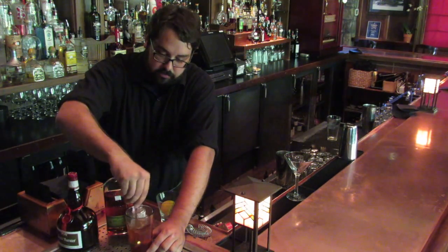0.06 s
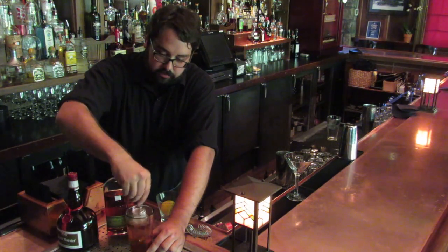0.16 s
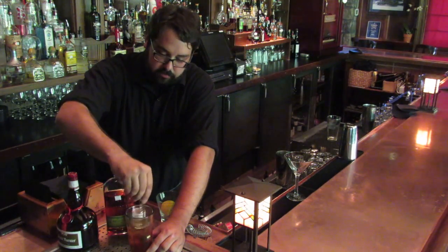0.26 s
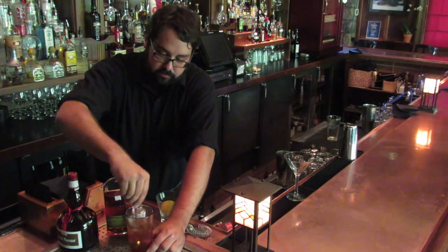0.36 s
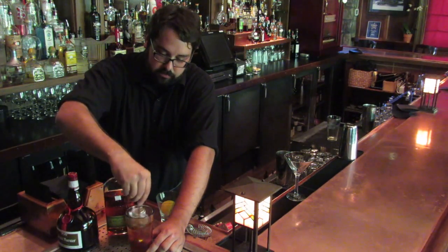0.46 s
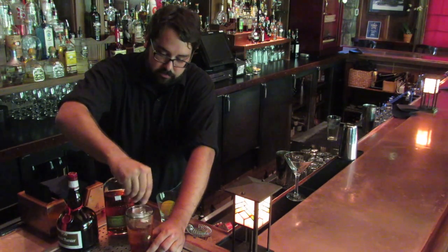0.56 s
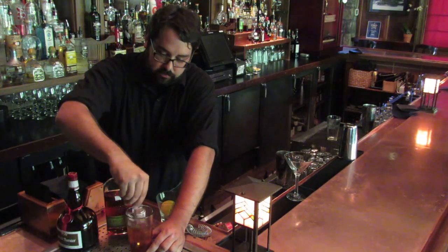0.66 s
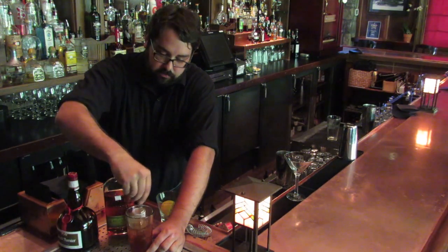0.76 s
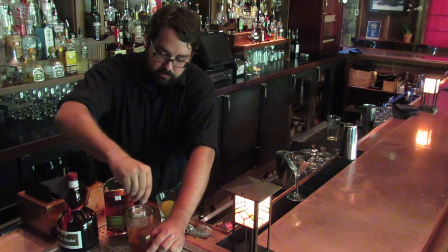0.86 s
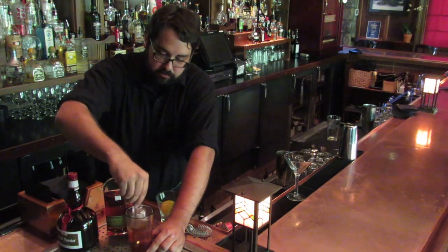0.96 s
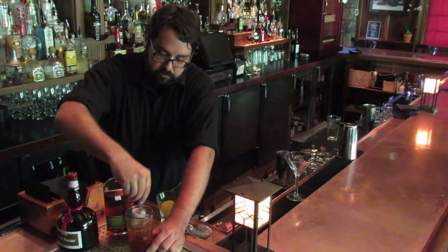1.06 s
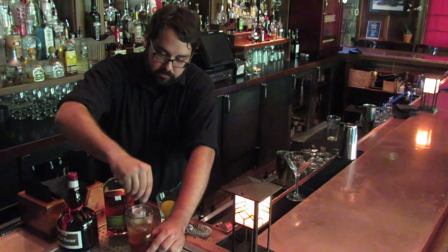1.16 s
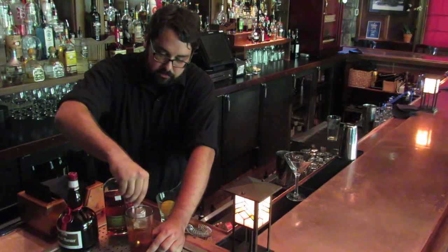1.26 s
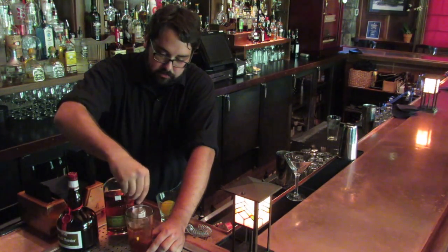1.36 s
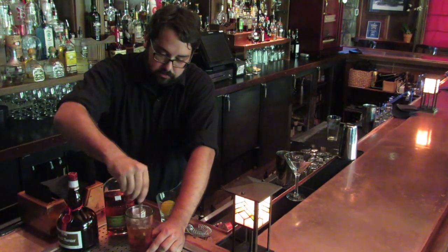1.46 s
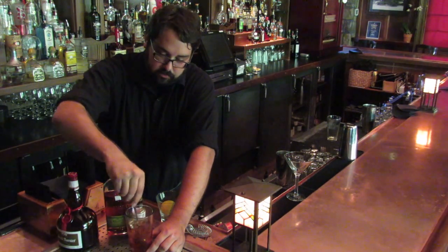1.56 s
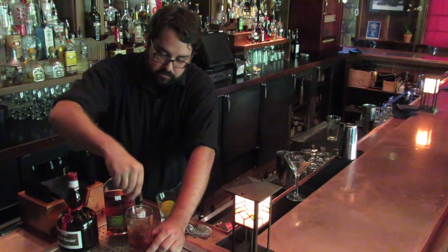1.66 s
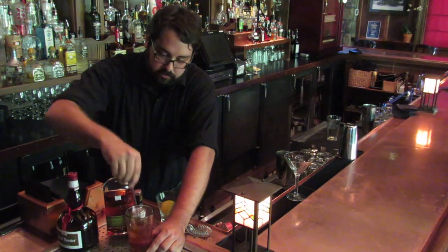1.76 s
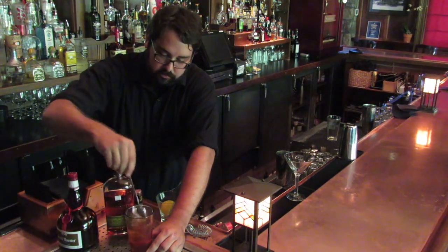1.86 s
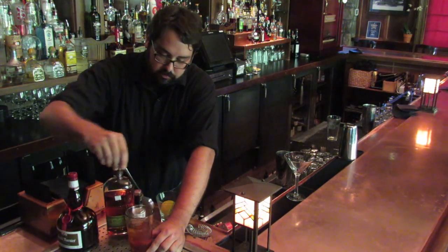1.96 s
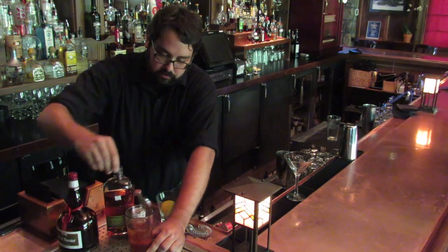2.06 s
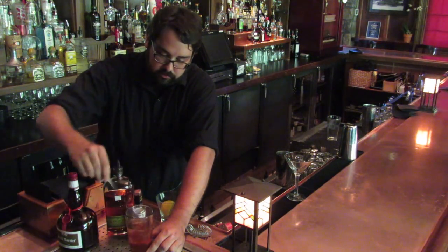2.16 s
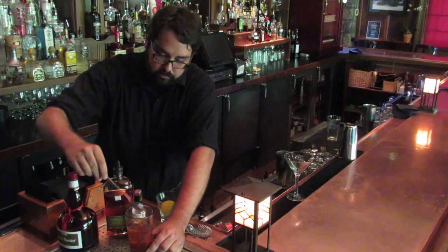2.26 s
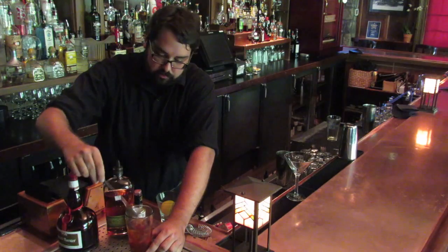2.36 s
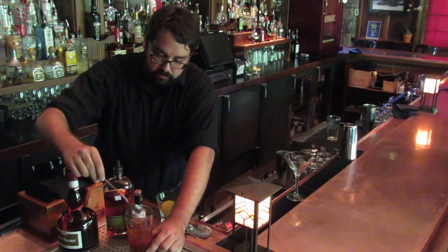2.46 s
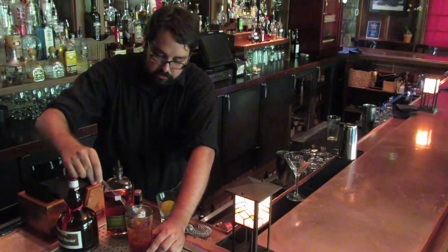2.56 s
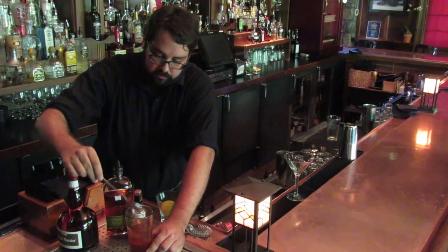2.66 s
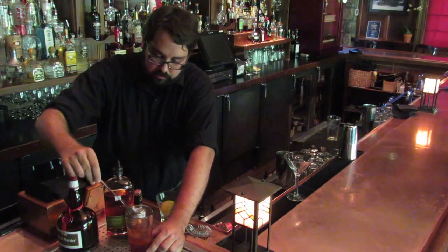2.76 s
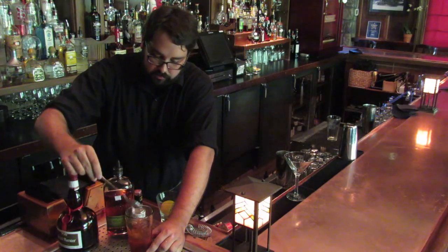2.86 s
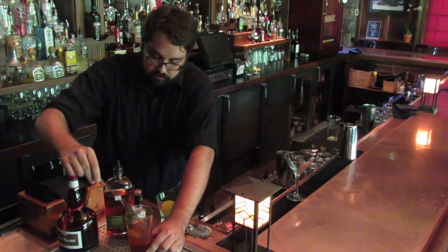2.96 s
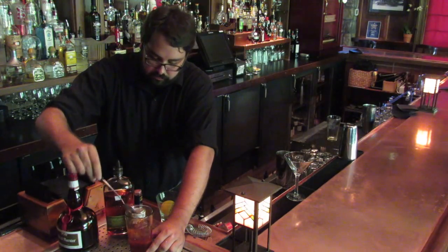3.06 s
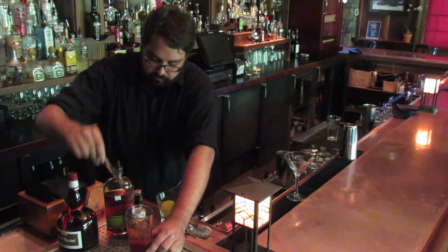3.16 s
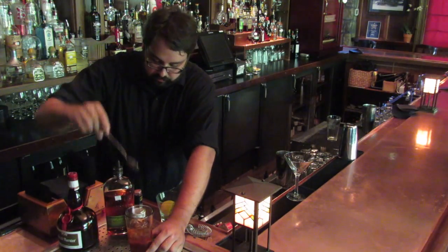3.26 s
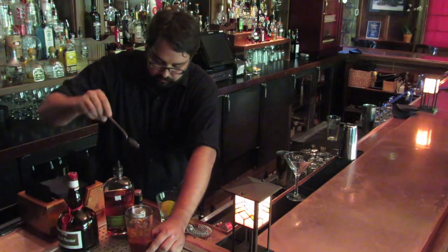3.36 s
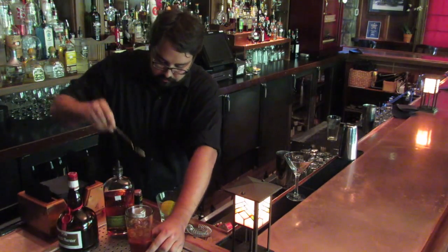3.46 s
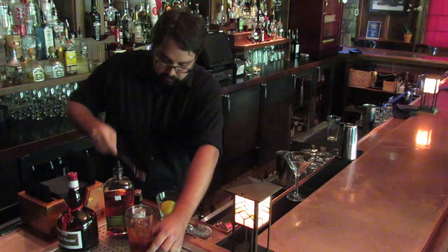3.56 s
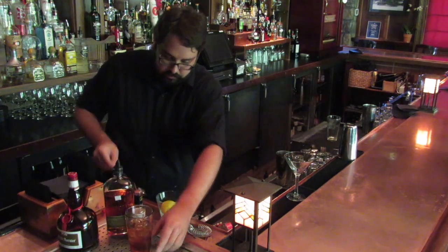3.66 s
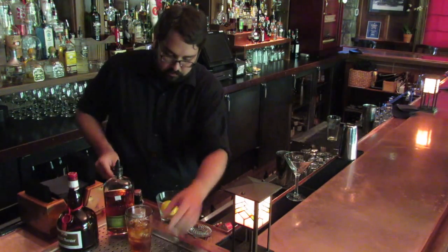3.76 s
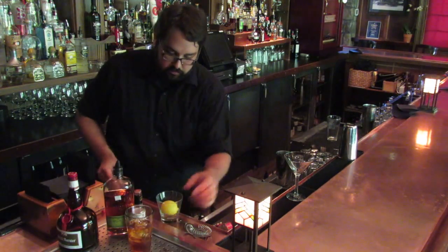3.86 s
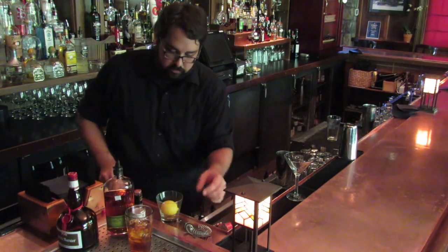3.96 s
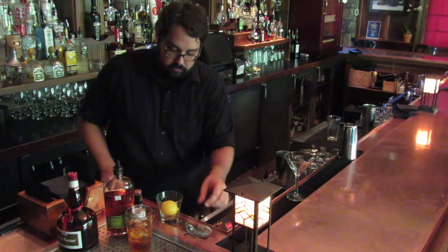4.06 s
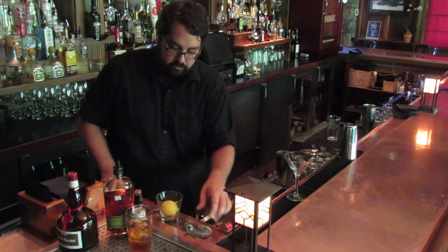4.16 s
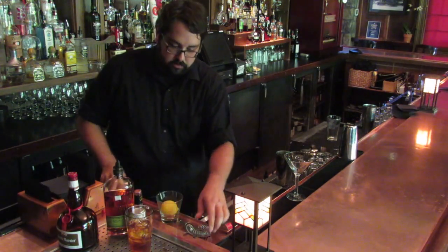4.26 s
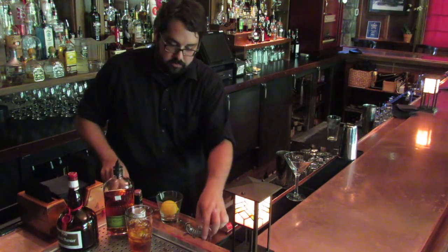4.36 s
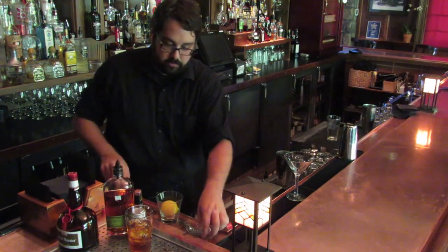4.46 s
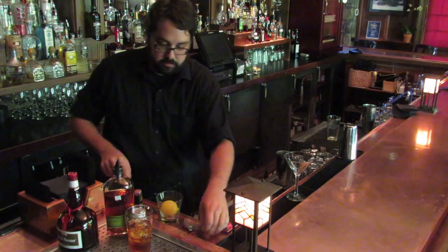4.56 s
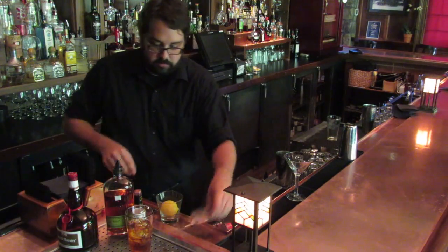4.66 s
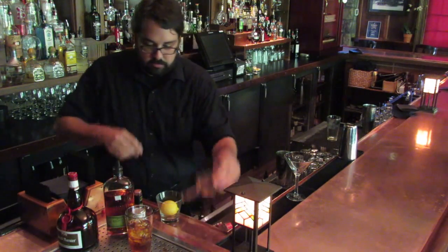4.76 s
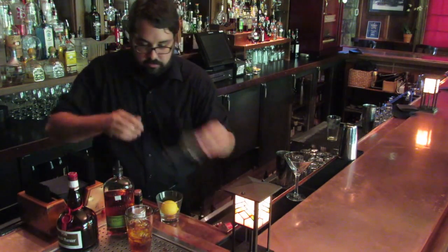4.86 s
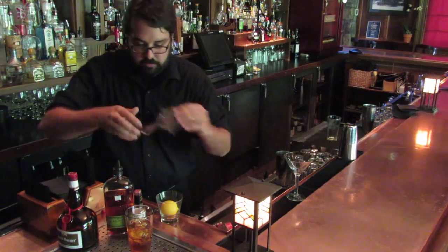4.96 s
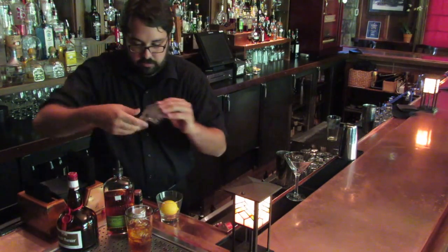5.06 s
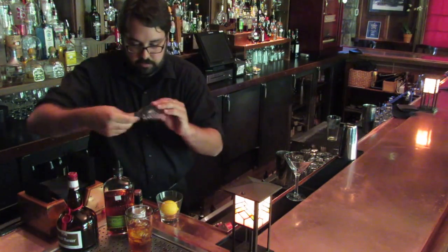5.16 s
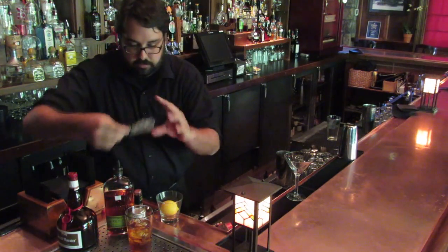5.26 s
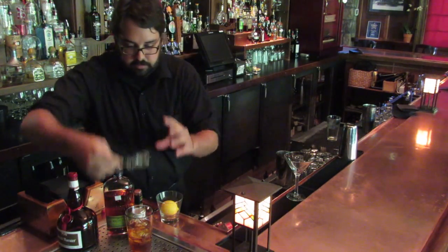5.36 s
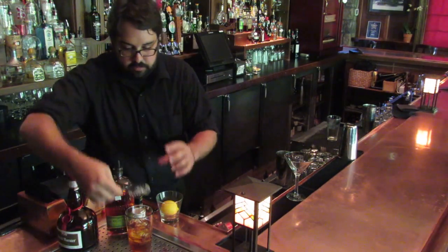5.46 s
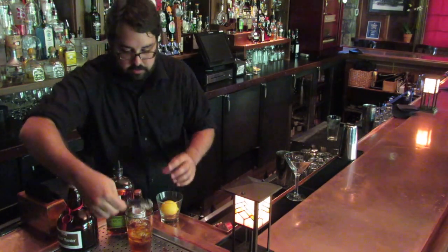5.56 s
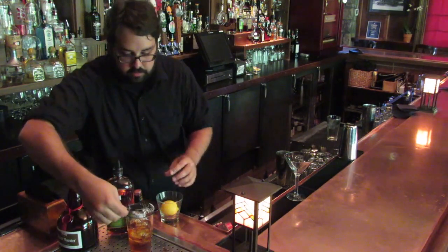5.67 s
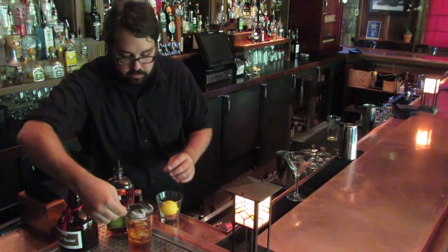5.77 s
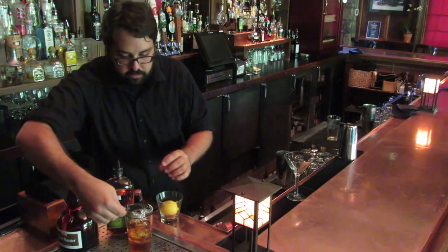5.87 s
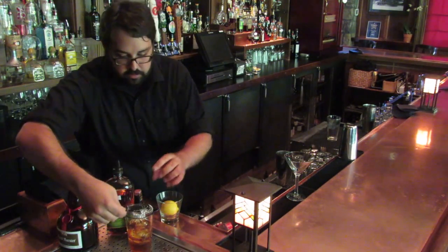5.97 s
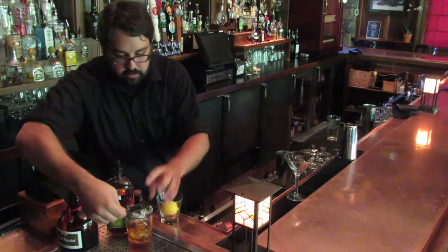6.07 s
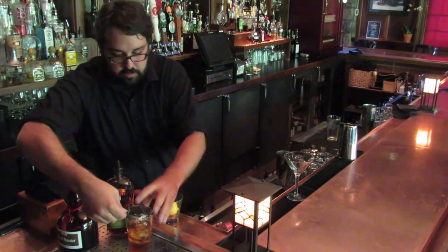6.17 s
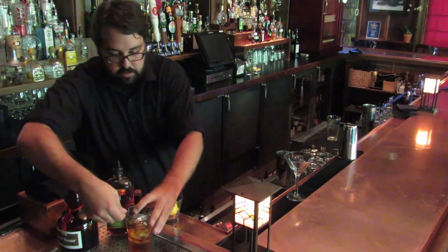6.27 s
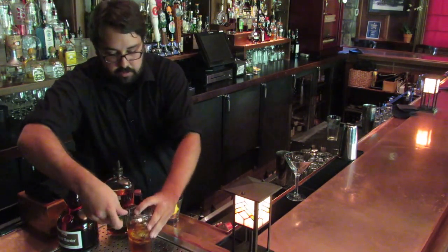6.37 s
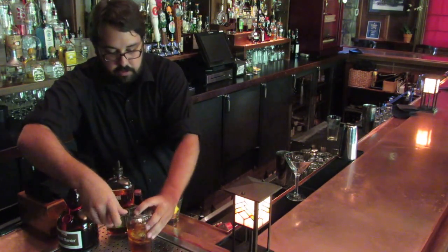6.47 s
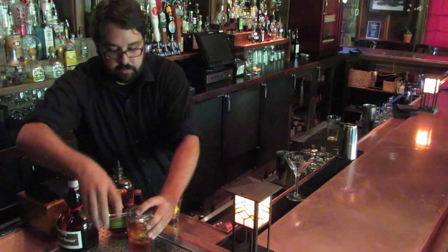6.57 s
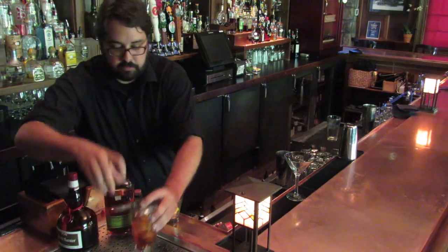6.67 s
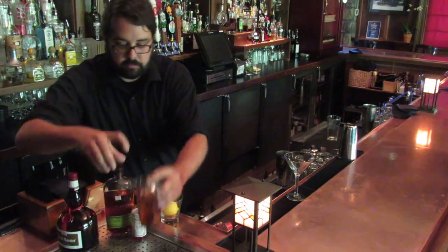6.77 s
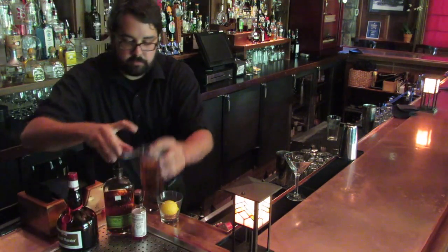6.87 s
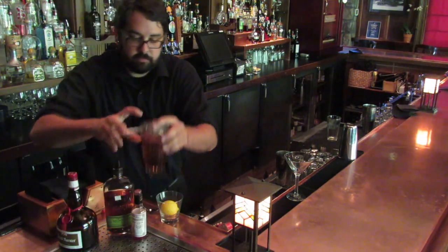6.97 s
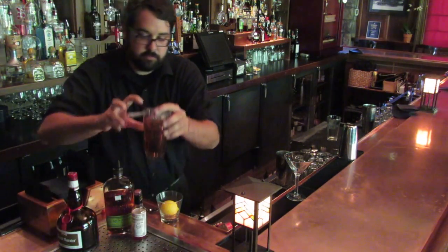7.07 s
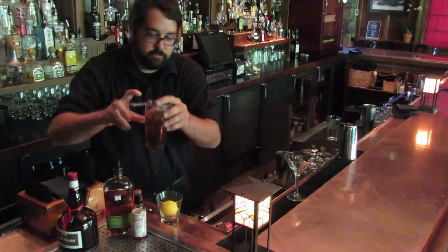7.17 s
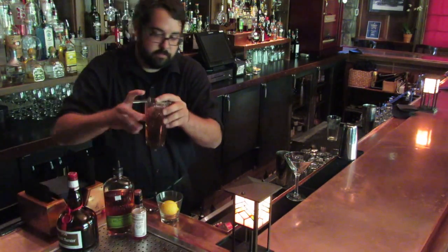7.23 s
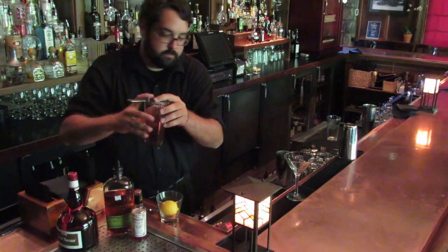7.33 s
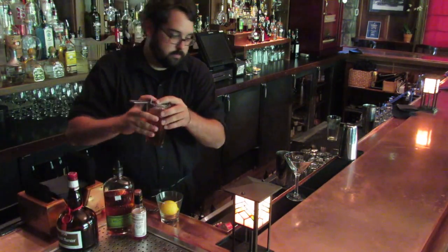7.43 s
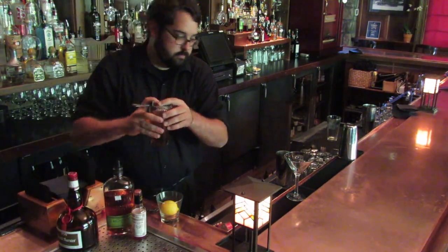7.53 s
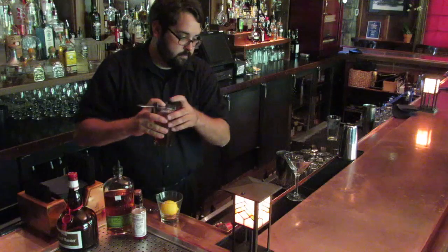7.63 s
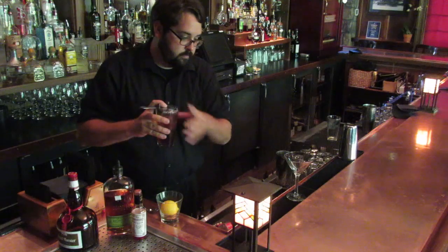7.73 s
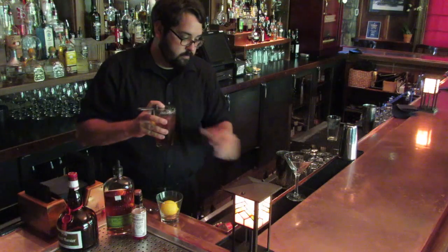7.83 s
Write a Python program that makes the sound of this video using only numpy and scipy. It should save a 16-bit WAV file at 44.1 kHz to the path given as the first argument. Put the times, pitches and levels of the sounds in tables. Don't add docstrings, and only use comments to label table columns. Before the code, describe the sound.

Ice clinks and sloshes under a stirring spoon, five ringing rim taps follow, then counter knocks, springy metal rattle and small glass clinks in a humming bar.

```python
import sys
import numpy as np
from scipy import signal
from scipy.fft import rfft, irfft
from scipy.io import wavfile

SR = 44100
rng = np.random.default_rng(int(sys.argv[2]) if len(sys.argv) > 2 else 0)


def elevation(decibels):
    levels = np.asarray(decibels, float)
    return 10 ** (levels / 20)


def wrap_up_sound(samples):
    columns = np.atleast_2d(samples).T
    tamed = np.clip(columns, -1, 1)
    steps = np.round(tamed * 32767).astype(np.int16)
    wavfile.write(sys.argv[1], SR, steps)


N = 348390


def rms_one(x):
    return x / np.sqrt(np.mean(x ** 2) + 1e-20)


def at_hz(points, hz):
    points = np.array(points)
    return np.interp(np.log(hz + 1), np.log(points[:, 0]), points[:, 1])


def colour(x, spectrum):
    gain = elevation(at_hz(spectrum, np.fft.rfftfreq(N, 1 / SR)))
    return rms_one(irfft(rfft(x) * gain, N))


def bandpass(x, low_hz, high_hz):
    return signal.sosfilt(signal.butter(2, [low_hz, high_hz], "band", fs=SR, output="sos"), x)


def ring(clicks, hz, t60):
    radius = elevation(-60 / (t60 * SR))
    angle = 2 * np.pi * hz / SR
    return signal.lfilter([0, np.sin(angle)], [1, -2 * radius * np.cos(angle), radius ** 2], clicks + 1e-18)


def clicks_at(seconds, sizes):
    out = np.zeros(N)
    np.add.at(out, np.round(np.asarray(seconds) * SR).astype(int), sizes)
    return out


def grains(per_s, spread_db):
    sizes = elevation(spread_db * np.minimum(rng.exponential(1, N), 4)) * rng.choice([-1, 1], N)
    return sizes * (rng.random(N) < per_s / SR)


# t/s, level/dB
GAIN_DUCKS = [
    (2.26, 5),
    (2.45, 2.5),
    (2.66, 4),
    (2.85, 2),
    (3.061, 3),
    (6.56, 3.0),
]


def gain_control_db():
    duck_s, recover_db_per_s = 0.16, 5
    t = np.arange(N) / SR
    climb = recover_db_per_s * t
    for s, db in GAIN_DUCKS:
        climb -= db * (1 - np.exp(-np.maximum(t - s, 0) / duck_s))
    return climb - np.maximum.accumulate(climb)


# f/Hz, level/dB (per Hz)
RUMBLE = [(15, -41), (30, -27), (64, -21), (140, -12), (170, -6.5), (285, -10), (326, -14), (420, -15.5),
          (650, -27.5), (1040, -27), (2280, -39), (3200, -46.5), (8000, -52.5), (16000, -61)]
# f/Hz, width/Hz, level/dB (re rumble)
DRONES = [(63.5, 1.8, -20.5), (80.1, 1.6, -16.5), (164.5, 5.1, -11.5), (214, 3.7, -16), (240.2, 3.2, -15),
          (292.3, 3.4, -11), (362.9, 7.7, -17), (407.5, 3.9, -15), (454.4, 8.1, -22.5), (518.8, 13, -27.5)]
IN_STEP_S = [.15, 1.0, 1.8, 3.25, 4.3, 5.5, 6.65, 7.95]
# f/Hz, unshared share/1
APART = [(60, 0.13), (300, 0.42), (700, 0.57), (1500, 0.31), (4000, 0.15), (8000, 0.33), (15000, 0.95)]


def coolers():
    gain_db = gain_control_db()
    t = np.arange(N) / SR
    shared, left, right = rfft(rng.standard_normal((3, N)))
    hz = np.fft.rfftfreq(N, 1 / SR)
    apart = np.clip(at_hz(APART, hz), 0, 1)
    both = np.sqrt(1 - apart ** 2) * shared + apart * np.array([left, right])
    rumble = rms_one(irfft(both * elevation(at_hz(RUMBLE, hz)), N))
    for centre_hz, width_hz, level_db in DRONES:
        resonance = 1 / (1 + (2 * (hz - centre_hz) / width_hz) ** 2)
        rumble += elevation(level_db) * rms_one(irfft(shared * resonance, N))
    beats = np.interp(t, IN_STEP_S, np.arange(len(IN_STEP_S)))
    beat_db = 2 * np.cos(2 * np.pi * beats)
    hum = np.sqrt(2) * np.sin(2 * np.pi * 120 * t)
    return elevation(gain_db - 29) * rumble + elevation(gain_db + beat_db - 27) * hum


# f/Hz, t60/s
ROOM = [(700, 1), (2000, 0.62), (4500, 0.53), (8000, 0.44), (13000, 0.35)]


def room(x):
    early_t60_s, early_db = 0.13, -3.5
    sway_per_s = 2.3
    t = np.arange(SR) / SR
    tail = 0
    for low in 350 * 2 ** np.arange(0, 6.):
        high = min(2 * low, .45 * SR)
        hz = np.sqrt(low * high)
        shared, left, right = rng.standard_normal((3, 2, SR))
        apart = np.clip(0.25 * at_hz(APART, hz), 0, 1)
        noise = np.sqrt(1 - apart ** 2) * shared + apart * np.array([left, right])
        decay = elevation(-60 * t / at_hz(ROOM, hz)) + elevation(early_db - 60 * t / early_t60_s)
        tail = tail + bandpass(noise, low, high) * decay
    tail *= np.clip((t - .0015) / 0.0033, 0, 1)
    tail /= np.sqrt(np.mean(np.sum(tail ** 2, axis=2)))
    sway = np.pi * sway_per_s * np.arange(N) / SR
    shares = x * np.array([np.cos(sway), np.sin(sway)])
    return signal.fftconvolve(shares[None], tail, axes=2).sum(axis=1)[:, :N]


SHAKES_S = [3.919, 4.323, 4.618, 5.692, 5.722, 6.146, 6.409]
# hold/s, level/dB, jolt/dB
RATTLE = [
    (.005, -46.5, 13.5),
    (0.22, -45.5, 14),
    (0.0045, -43, 8),
    (.025, -55, 1.5),
    (0.0043, -51, 0),
    (0.039, -41, 1),
    (.005, -41, 9),
]


def rattle_level():
    jolt_s, fall_db_per_s = 0.014, 177
    t, level = np.arange(N) / SR, 0
    for s, (hold, db, jolt_db) in zip(SHAKES_S, RATTLE):
        since = np.maximum(t - s, 0)
        fall_db = fall_db_per_s * np.maximum(since - hold, 0)
        level = level + (t >= s) * elevation(db + jolt_db * np.exp(-since / jolt_s) - fall_db)
    return level


# f/Hz, level/dB (per Hz)
SPRING = [(710, -27), (1200, -10.5), (2320, 0.5), (3870, -16.5), (6650, -4.5), (11700, -8), (16000, -21)]
# f/Hz, level/dB, t60/s
PLATE = [(6600, -5.5, 0.14), (7300, -2.5, 0.13), (10000, -14, .1), (11100, -7, 0.072), (13450, -14, .08)]
# t/s, level/dB, low mode/dB, middle mode/dB, high modes/dB
PLATE_HITS = [(3.929, -48, -15, 5, -11), (4.324, -34, 6, -8, -11), (4.40, -54, -5, -6, -10),
              (4.462, -42.5, 9, 1, -10), (4.586, -34, -18, -20, 0), (4.69, -44, -18, -20, 0)]
# f/Hz, level/dB, t60/s
LIFT = [(4400, 3.5, 0.0069), (7080, 1, 0.01), (10900, -2, 0.0065)]
# t/s, level/dB
LIFT_HIT = (6.9435, -29.5)


def strainer():
    out = elevation(-2.5) * rattle_level() * colour(grains(2500, spread_db=2.5), SPRING)
    hits = np.array(PLATE_HITS)
    for k, (hz, level_db, t60) in enumerate(PLATE):
        mode_db = hits[:, 2 + min(k, 2)]
        out += ring(clicks_at(hits[:, 0], elevation(hits[:, 1] + level_db + mode_db)), hz, t60)
    lift_s, lift_db = LIFT_HIT
    for hz, level_db, t60 in LIFT:
        out += ring(clicks_at([lift_s], elevation(lift_db + level_db)), hz, t60)
    return out


# t/s, level/dB (peak), brightest/octaves above 1 kHz, fall-off/dB per octave
KNOCKS = [(3.919, -19.5, 1.9, 5.5), (3.954, -43, 0.64, 6), (3.999, -33.5, .4, 14), (4.3242, -16, 2.23, 17),
          (4.3295, -25.5, .6, 0.5), (4.3971, -20, 0.32, 14), (4.436, -26, .6, 5), (4.456, -18.5, 1.65, 9),
          (4.567, -16.5, 1.67, 7), (4.619, -27, 1.67, 0.5), (5.6914, -25, 3.1, 2.5), (5.721, -34, 2.8, 16),
          (6.0474, -34, 2.6, 3.0), (6.1472, -32, 3.2, 20), (6.2022, -17, 0.72, 1.5),
          (6.2134, -26, 0.36, -0.5), (6.3837, -32, 2.8, 7), (6.4073, -17.5, 2.5, 3.0),
          (6.5596, -33, 2.6, 2.5), (6.9416, -17.5, 1.52, 8), (7.5654, -44, .4, 9), (7.586, -34, 1.4, 7)]
# low f/Hz, high f/Hz
KNOCK_BANDS_HZ = [(800, 2500), (2500, 6000), (6000, 10000), (10000, 16000)]


def knocks():
    s, peak_db, brightest, falloff = np.array(KNOCKS).T
    out = np.zeros(N)
    noise = rng.standard_normal(N)
    decays_s, trims_db = (0.0054, 0.0011, 0.0018, 0.0013), (-6, -6, -6, -4.5)
    for (low, high), decay_s, trim_db in zip(KNOCK_BANDS_HZ, decays_s, trims_db):
        band = rms_one(bandpass(noise, low, high))
        octave = np.log2(low * high / 1e6) / 2
        away = np.abs(octave - brightest)
        starts = clicks_at(s, elevation(peak_db - falloff * away + trim_db))
        out += band * signal.lfilter([1], [1, -np.exp(-1 / (decay_s * SR))], starts + 1e-18)
    return out


# t/s, level/dB (peak), f/Hz
CUBES = [(0.019, -27, 2880), (.0767, -24, 3690), (0.2796, -23, 3250), (0.297, -19, 2920),
         (.3596, -27, 2800), (0.4493, -24, 2930), (0.555, -22, 3100), (.5761, -35, 2900),
         (0.61, -18.5, 3050), (0.747, -27, 3020), (.7696, -16.5, 3710), (.8225, -24, 3730),
         (0.849, -16, 3280), (0.8714, -16.5, 2740), (0.9001, -15, 3070), (1.4082, -19, 3400),
         (1.5278, -19.5, 3030), (1.7442, -16.5, 2970), (1.7699, -36, 2840), (0.0215, -21, 1395),
         (1.059, -22, 1427), (1.11, -22.5, 1390), (1.1474, -19.5, 1350), (1.1889, -20.5, 1660),
         (1.649, -39, 1140)]
# t/s, level/dB (peak), f/Hz
SPOON = [(0.0782, -26, 9700), (.2249, -28, 9600), (.2922, -26, 9750), (.9068, -33, 9600),
         (1.1418, -20, 9620), (1.1877, -20, 9500), (1.4685, -25, 8860), (1.5953, -27, 10000),
         (1.7789, -28, 10100), (0.509, -16, 5100), (1.1283, -30, 5150), (1.711, -15, 5570)]
# t/s, level/dB (peak), f/Hz
TICKS = [(3.918, -24.5, 1620), (3.9603, -32, 1610), (4.3289, -19, 2450), (4.3989, -24, 2440),
         (4.4588, -20.5, 2970), (4.618, -39, 2360), (6.1998, -21, 1580), (6.219, -27, 1620),
         (6.4096, -40, 1840), (3.917, -26, 4320), (4.566, -29, 4660), (4.6184, -25.5, 5170),
         (4.6194, -23.5, 4520), (4.6738, -32, 4280), (5.692, -27, 10200), (5.7224, -28, 11000),
         (6.1494, -26, 9500)]
# t/s, level/dB, f/Hz, t60/s
BAR_TOP = (3.917, -33, 546, .1)


def pings():
    out, t = np.zeros(N), np.arange(SR // 8) / SR
    strikes = [(*row, 0.027 * (3000 / row[2]) ** 0.3) for row in CUBES]
    strikes += [(*row, 0.021) for row in SPOON]
    strikes += [(*row, 0.018) for row in TICKS]
    strikes += [BAR_TOP]
    for s, peak_db, hz, t60 in strikes:
        part = out[round(s * SR):][:len(t)]
        part += elevation(peak_db - 4.0 - 60 * t / t60) * np.sin(2 * np.pi * hz * t)
    chatter = rms_one(signal.lfilter([1], [1, -.93], rng.standard_normal(N)))
    return out * (0.79 + .5 * chatter)


# t/s, spoon pressure level/dB, ice tumbling level/dB
TURNS = [
    (0.0, -35.5, -31),
    (.32, -34.5, -38),
    (.61, -39, -34.5),
    (.88, -28.5, -32.5),
    (1.171, -33, -34.5),
    (1.41, -38, -37),
    (1.53, -34.5, -34),
    (1.74, -33.5, -38.5),
]


def stirring_db(column):
    rise_db_per_s, fall_db_per_s = 81, 56
    spoon_out_s, settle_db_per_s = 1.79, 90
    t, rows = np.arange(0, N, 64) / SR, np.array(TURNS)
    since = t - rows[:, :1]
    slope = np.where(since < 0, rise_db_per_s, -fall_db_per_s)
    power = np.sum(elevation(2 * (rows[:, column, None] + slope * since)), axis=0)
    db = 10 * np.log10(power + 1e-20) - settle_db_per_s * np.maximum(t - spoon_out_s, 0)
    return np.interp(np.arange(N) / SR, t, db)


# f/Hz, level/dB (per Hz)
ICE = [(530, -35), (900, -12.5), (1900, -8.5), (3000, -5.5), (4860, 2.5), (5960, -1.5), (9000, -8.5),
       (12100, -4.5), (15000, -17), (16500, -21)]


def ice():
    pitches, dealt = np.geomspace(1100, 15000, 24), rng.integers(0, 24, N)
    born = grains(900, spread_db=5.0)
    knocking = sum(ring(born * (dealt == k), hz, 49.0 / hz) for k, hz in enumerate(pitches))
    slosh = rms_one(knocking) + 0.93 * rms_one(grains(2500, spread_db=9.5))
    return elevation(stirring_db(column=2) - 3.0) * colour(slosh, ICE)


# t/s, ring level/dB, hardness/dB, side/dB, crack level/dB
TAPS = [
    (2.254, -25.5, 17, 2, 10),
    (2.449, -17, 4.5, -11.5, 2),
    (2.653, -19.5, 7.5, -8.5, -8),
    (2.844, -23, 9, -6, 0.5),
    (3.051, -15, 2.5, -8, -4),
]


def crack():
    taps = np.array(TAPS)
    burst = rng.standard_normal(400) * np.exp(-np.arange(400) / (0.0024 * SR))
    noise = np.convolve(clicks_at(taps[:, 0], elevation(taps[:, 4] - 12.0)), burst)[:N]
    return bandpass(noise, 1700, 2900) + elevation(-10) * bandpass(noise, 5500, 12000)


# f/Hz, level/dB, sag/dB per s, touch after/s, damped fall/dB per s
RIM_NOTE = [
    (1897, -7.5, 20, 0.039, 155),
    (1902, -10.5, 97, 0.18, 498),
    (1914, -13, 10.5, 0.05, 336),
    (1906, -13, 76, 0.094, 419),
    (1875, -14.5, 87, 0.017, 400),
]


def rim_note():
    strike_s, onset_s = .004, .0007
    out, t = np.zeros(N), np.arange(N) / SR
    starts = [tap[0] for tap in TAPS]
    for start, end, (hz, db, sag, touch, damped) in zip(starts, starts[1:] + [t[-1]], RIM_NOTE):
        since = np.maximum(t - start, 0)
        fall_db = sag * np.minimum(since, touch) + damped * np.maximum(since - touch, 0)
        level = elevation(db - fall_db + 4.6 * np.exp(-(since / strike_s) ** 2))
        level *= 1 - np.exp(-since / onset_s)
        out += np.sqrt(2) * level * np.sin(2 * np.pi * hz * since) * (t < end)
    return out


# f/Hz, level/dB, t60/s
GLASS = [(1903.5, 3.5, 0.11), (2280, -17, 0.016), (4407, -5, 0.12), (4410, -4, 0.095), (4818, 4, 0.079),
         (5400, -17.5, 0.11), (6670, -21, 0.055), (6905, -4, 0.055), (7603, -5.5, 0.028), (7700, 2, 0.046),
         (7787, -2.5, 0.024), (9260, -19, 0.0185), (11720, -14.5, 0.03), (13300, -14.5, .03)]
FAMILY_EDGES_HZ = [2500, 4600, 6000, 7200]
# t/s, ring level/dB, hardness/dB, side/dB
CLINKS = [(0.0781, -37, -8, -3), (0.168, -33, -9.5, 21), (0.2126, -33, -7, 0), (0.2656, -37, -3, 4),
          (0.2834, -32, -11.5, 6.5), (0.299, -47, -13, -11.5), (0.3182, -36, -1, 10), (0.3633, -29, 8, -6),
          (0.435, -54, -7.5, 8.0), (0.4491, -32, 5.5, -19), (0.5092, -36, -13, 20.0), (0.5319, -37, -5, -7),
          (0.5571, -28.5, 0.5, -3), (0.609, -25.5, -1, -16), (0.7354, -55, -12.5, -4),
          (0.7487, -25.5, 0, 4), (0.8001, -28.5, 2, 4), (0.8251, -28.5, 4.5, -5), (0.9329, -38, 2, 0),
          (1.034, -27, 4.5, -9), (1.129, -42.5, -20, 2), (1.1729, -31, -2, 16), (1.279, -32, 0, -1),
          (1.4086, -48, 3, 2.5), (1.4684, -45, 1, 0), (1.5097, -37, -4, -13), (1.527, -29.5, -1.5, -16.0),
          (1.71, -28, -1, -1), (1.7449, -27, -2.5, -18)]
# t/s, ring level/dB, hardness/dB, side/dB
FITTING = [(5.6685, -59, -3.0, 5.5), (5.6917, -45, -4, 11), (5.7229, -42, 9.5, -6), (5.944, -54.5, 10, 3),
           (5.9897, -51.5, 8.5, -12), (6.15, -43.5, -5, 9), (6.163, -41.5, 11, -9), (6.4093, -44, 8, 7),
           (7.587, -55, 8, 3.5)]
SHIFTS = (-0.0072, 0.00076, 0.0048)


def glass():
    outer_db = -5
    held_share = 0.72
    rows = np.array([tap[:4] for tap in TAPS] + CLINKS + FITTING)
    s, ring_db, hard_db, side_db = rows.T
    strike = np.arange(len(s))
    tapped = strike < len(TAPS)
    families = [np.where(tapped, -38, outer_db - hard_db),
                np.minimum(-side_db, 0),
                np.minimum(side_db, 0),
                np.where(tapped, -7, 0.5),
                outer_db + hard_db]
    luck_db = 3.6 * rng.standard_normal((len(rows), len(GLASS)))
    slide = elevation(stirring_db(column=1) - 36.5)
    slides = [slide * rms_one(grains(300, spread_db=4.5)) for _ in SHIFTS]
    out = np.zeros(N)
    for k, (hz, level_db, t60) in enumerate(GLASS):
        family_db = families[np.searchsorted(FAMILY_EDGES_HZ, hz)]
        sizes = elevation(ring_db + family_db + level_db + 1.5 + luck_db[:, k])
        out += ring(clicks_at(s, sizes * tapped), hz, t60)
        for j, shift in enumerate(SHIFTS):
            dealt = ~tapped & ((strike + k) % len(SHIFTS) == j)
            drive = clicks_at(s, sizes * dealt) + elevation(level_db) * slides[j]
            out += ring(drive, hz * (1 + shift), t60 * held_share)
    return out


def scene():
    ringing = signal.sosfilt(signal.butter(2, 1500, "high", fs=SR, output="sos"), glass())
    near = ringing + ice() + strainer()
    sharp = knocks() + pings()
    note, tick = rim_note(), crack()
    wet = room(near + elevation(-0.5) * sharp + elevation(-14) * note + elevation(-5.5) * tick)
    return elevation(-1.0) * near + sharp + note + tick + elevation(1.0) * wet + coolers()


def low_pass(x):
    return signal.sosfilt(signal.butter(12, 16430, fs=SR, output="sos"), x)


# f/Hz, level/dB, lead/rad
RIGHT = [(25, -1, 1.8), (60, -9.5, 0.82), (308, -10.5, 0.91), (696, -5, 0.53), (1250, -3, 0.48),
         (2640, -0.5, 0.19), (5300, -3, 0.48), (16000, -1, 1.54)]


def record(dry):
    notch_hz, notch_width_hz = 678, 79
    x = signal.lfilter(*signal.iirnotch(notch_hz, notch_hz / notch_width_hz, fs=SR), dry)
    hz, right = np.fft.rfftfreq(N, 1 / SR), np.array(RIGHT)
    turn = elevation(at_hz(right, hz)) * np.exp(1j * at_hz(right[:, ::2], hz))
    x = np.array([x[0], irfft(rfft(x[1]) * turn, N)])
    over_db = np.maximum(20 * np.log10(np.max(np.abs(x), axis=0) + 1e-9) + 6, 0)
    fall = 20.0 * np.arange(N) / SR
    held_db = np.maximum.accumulate(over_db + fall) - fall
    pole = np.exp(-1 / (.005 * SR))
    cut_db = .6 * signal.lfilter([1 - pole], [1, -pole], held_db)
    x = np.clip(x * elevation(-cut_db), -1, 1)
    x = signal.sosfilt(signal.cheby2(10, 50, 16600, fs=SR, output="sos"), x)
    return low_pass(x)


dry = scene()
out = record(dry)
wrap_up_sound(out)
```